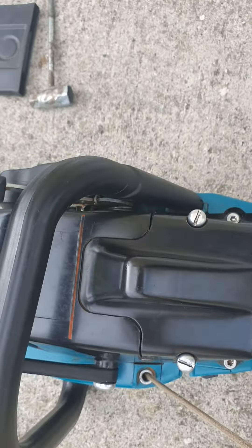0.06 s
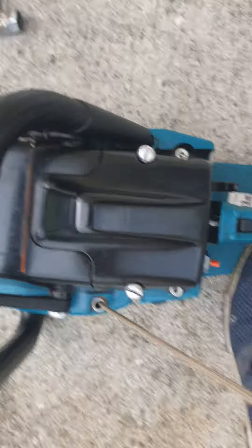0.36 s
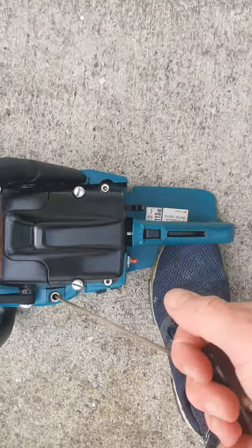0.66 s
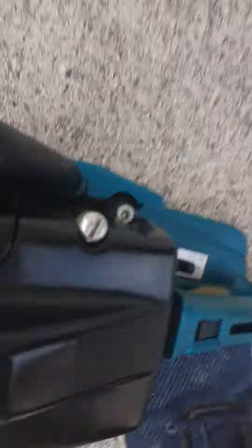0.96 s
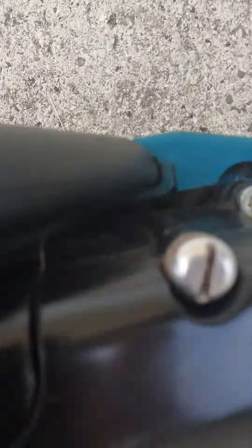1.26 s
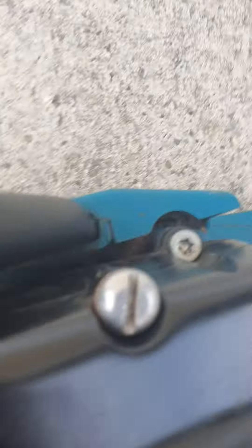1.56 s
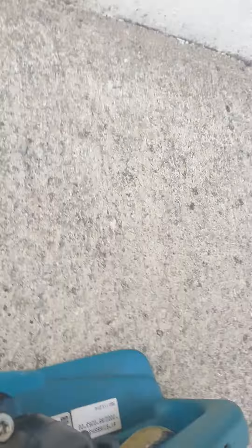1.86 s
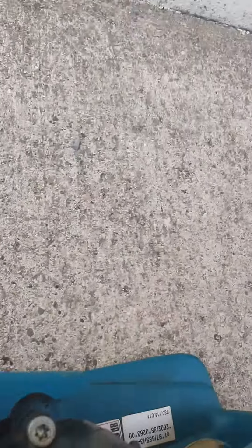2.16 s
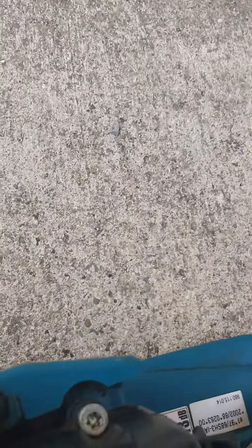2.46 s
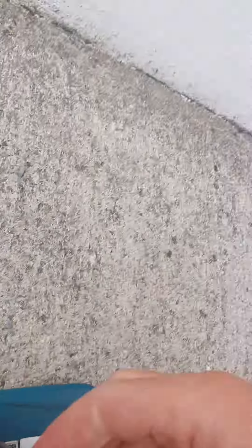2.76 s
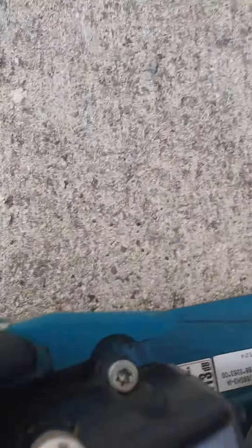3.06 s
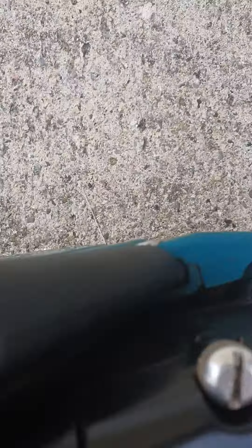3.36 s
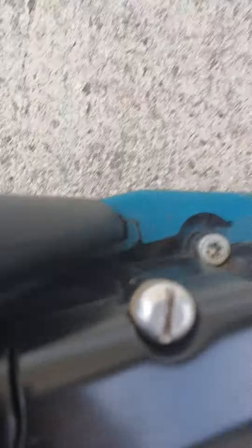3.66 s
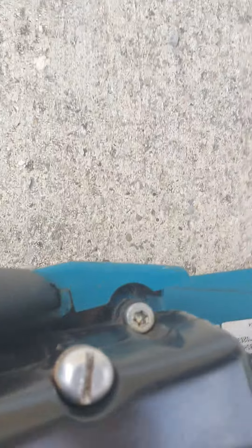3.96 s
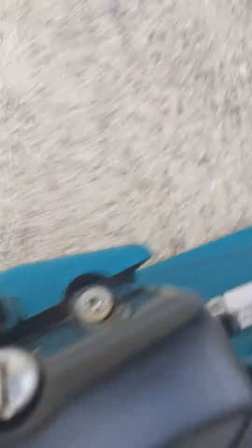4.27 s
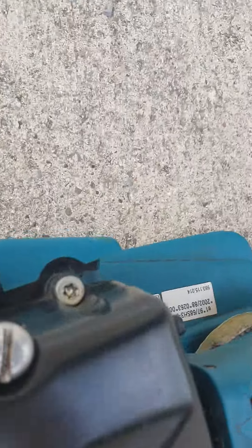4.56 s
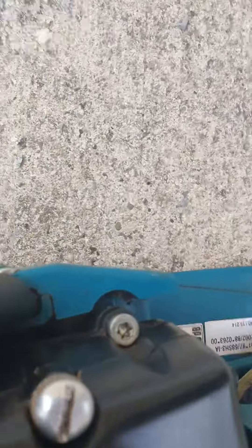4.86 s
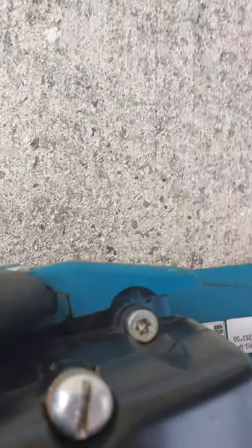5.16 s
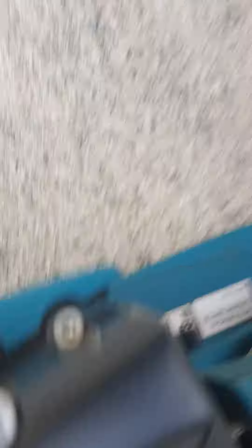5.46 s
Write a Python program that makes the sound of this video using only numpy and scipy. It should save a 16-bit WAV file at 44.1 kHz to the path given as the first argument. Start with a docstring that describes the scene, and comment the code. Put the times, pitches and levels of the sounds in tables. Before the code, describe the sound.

A petrol chainsaw is being pull-started close to the microphone in a concrete yard. Sharp metal clacks come as the cord takes up, then a pull spins the engine, which chugs to a stop while the cord ratchets back. Hollow plastic knocks and more clicks follow. A second pull fails the same way. On the third the engine fires and runs briefly with a fast, uneven, barking putter.

```python
"""A concrete yard, close up on a petrol chainsaw being pull-started.
Steel pawls clack on the flywheel as the rope takes up. Two pulls spin the engine, each compression
gulping air, and it chugs to a stop while the rope ratchets back. Hollow plastic parts knock between
pulls. On the third it fires and settles into a fast, four-stroking idle: every turn puffs through
the muffler, but only some ignite with a sharp bark."""
import sys
import numpy as np
from scipy import signal
from scipy.fft import rfft, irfft, next_fast_len
from scipy.io import wavfile
from scipy.ndimage import map_coordinates

SR = 44100
rng = np.random.default_rng(int(sys.argv[2]) if len(sys.argv) > 2 else 0)


def store_pcm(level_fs):
    """Save levels as 16-bit WAV."""
    pcm = np.round(np.clip(level_fs, -1, 1) * 32767).astype(np.int16)
    wavfile.write(sys.argv[1], SR, np.atleast_2d(pcm).T)


N = 252693
TIME = np.arange(N) / SR
AGE = np.arange(SR // 4) / SR  # seconds into a one-shot

# crank speed through each pull of the rope: t/s, speed/(turns/s)
FIRST_PULL = [(1.445, 0), (1.5, 28.5), (1.55, 45.3), (1.67, 31.1), (1.745, 17.6), (1.96, 10.3), (2.16, 0)]
SECOND_PULL = [(4.065, 0), (4.11, 22.7), (4.23, 42.1), (4.34, 23.4), (4.39, 16.3), (4.55, 9.9), (4.76, 0)]
THIRD_PULL = [(5.25, 0), (5.3, 30.6), (5.37, 40.6), (5.41, 41.6), (5.45, 55.1), (5.49, 54.2), (5.58, 68.9),
              (5.74, 68)]
# weight of each pull's chug: speed curve, level/dB, first-compression accent/dB, port re gulp/dB
CHUGS = [(FIRST_PULL, -8.5, 9.6, -9.5), (SECOND_PULL, -6.5, 5.9, 0.85), (THIRD_PULL, -6.5, -9.5, -5)]
# rush of gas and bearings in the failed pulls: speed curve, level/dB
FAILED_SPINS = [(FIRST_PULL, -21.5), (SECOND_PULL, -20)]
# the rope snatches and shakes the saw: t/s, level/dB
ROPE_SNATCHES = [(1.521, -8.5), (1.526, -9), (1.68, -2), (1.688, -6), (1.758, -16.5), (4.102, -7.5),
                 (4.14, -8.5)]
# spells when every second turn fires sharply: start/s, end/s, crack level/dB
SHARP_FIRING = [(5.415, 5.435, -13), (5.455, 5.47, -22), (5.49, 5.51, -10), (5.54, 5.615, -9),
                (5.615, 5.73, -9)]
# muffler roar as the engine picks up: t/s, level/dB
ROAR_FADER = [(5.25, -51.5), (5.32, -26), (5.43, -19.5), (5.51, -17.5), (5.73, -21)]
# pawls catch: t/s, steel level/dB, housing level/dB, pan L-R/dB
PAWL_CATCHES = [(0.0482, -7.5, -16.5, -1), (0.573, -7, -34, -2.5), (0.8642, -6, -27.5, -3),
                (1.1611, -17, -28, -2.5), (1.4378, -2.5, -10.5, -6), (1.5293, -6, -13, -2.5),
                (3.5274, -6.5, -14, -2), (3.676, -6.5, -15.5, -2), (4.0583, -8, -20, -7),
                (4.2489, -19.5, -29, -21), (5.2411, -15.5, -23, -3.5), (5.4226, -14.5, -25, -9.5),
                (5.4405, -9.5, -32, -2)]
# pawls skip as the rope rewinds: t/s, count, gap/s, level/dB, pan L-R/dB
PAWL_SKIPS = [(0.0424, 1, 0, -14.5, -12.5), (0.7817, 1, 0, -32.5, -4), (1.108, 2, 0.01, -7.5, -0.5),
              (1.3792, 1, 0.078, -28, -5), (1.687, 2, .021, -12, -2), (1.747, 4, .0205, -14, -9.5),
              (1.881, 4, 0.027, -10, -6), (2.2316, 1, 0.0064, -14.5, -6.5), (3.9946, 1, 0.0046, -19, -6),
              (4.35, 2, .0424, -9, -10), (4.47, 2, .0235, -8, -8.5), (4.517, 2, .025, -11, -8.5),
              (4.5949, 1, 0, -9.5, -2.5), (4.8784, 1, 0, -17.5, -4.5)]
# switch and handle knocks: t/s, level/dB, f/Hz, pan L-R/dB
PLASTIC_KNOCKS = [(0.299, -26.5, 364, -10.5), (0.478, -32.5, 301, -11), (0.507, -31.5, 580, -12),
                  (0.53, -28.5, 363, -12), (2.137, -29.5, 400, -1), (2.169, -30.5, 710, -2),
                  (2.404, -12, 1120, -6.5), (2.46, -7, 804, -6), (2.476, -9, 980, -3.5),
                  (2.531, -18, 900, -3), (2.694, -34.5, 800, -8.5), (2.741, -12, 1055, -2),
                  (3.09, -17, 1025, -2.5), (3.105, -16, 960, -12), (3.114, -21.5, 448, -6),
                  (3.348, -27.5, 1066, -4.5), (3.576, -27.5, 2560, 6), (3.601, -19, 2450, 1),
                  (3.611, -19.5, 2570, 4), (3.721, -17, 700, 0), (4.749, -25, 757, -5)]
# the hand slides the rope and shifts the saw: t/s, hold/s, rope level/dB, rumble level/dB
HAND_MOVES = [(0, 0.0088, -49, -46.5), (0.371, 0.047, -45, -46.5), (0.464, 0.19, -52.5, -45.5),
              (0.841, 0.11, -48.5, -35), (0.98, 0.19, -54.5, -42), (1.395, 0.65, -54, -43.5),
              (2.803, .02, -70, -64.5), (3.125, 0.0096, -57, -55), (3.321, 0.033, -59, -51.5),
              (3.483, 0.097, -51, -51), (3.607, 0.044, -39.5, -39.5), (4.01, 0.61, -44.5, -49)]
# the saw rocks on the ground: t/s, level/dB, f/Hz
GROUND_THUMPS = [(0.804, -30.5, 123), (0.857, -17, 91), (0.892, -15.5, 140), (0.917, -18.5, 107),
                 (0.977, -26, 149), (1.143, -29, 75)]

# noise colours: f/Hz, level/dB
EXHAUST_EQ = [(150, -31), (250, -0.5), (348, -5), (414, -2), (775, -7.5), (1060, -7.5), (1180, -8.5),
              (1420, -12.5), (1700, -11.5), (2570, -13), (3400, -19.5), (4490, -21.5), (5730, -23),
              (8550, -22.5), (16000, -30)]  # throaty muffler
CRACK_EQ = [(1500, -38), (4000, -3.5), (8500, -0.5), (12000, -3), (16000, 0)]  # bright edge of a firing
RUSH_EQ = [(150, -42), (260, -3), (298, -13.5), (349, -4), (683, -14), (869, -17.5), (1250, -16.5),
           (1460, -17.5), (1700, -20.5), (2570, -21.5), (5500, -31.5), (7890, -37), (8750, -27.5),
           (12800, -33), (16000, -47.5)]  # gas and bearings
CLANK_EQ = [(180, -33), (400, -2), (850, 3.5), (1500, -5), (1800, -7.5), (2600, -9), (3400, -18.5),
            (4600, -18.5), (6500, -21.5), (10000, -26.5), (16000, -29)]  # loose parts
CLACK_EQ = [(300, -21), (700, -4), (1500, -0.5), (2100, -4.5), (3200, -0.5), (4400, -1.5), (6500, -14.5),
            (8000, -5), (9500, 0), (11000, -5), (12700, 4), (16000, -7.5)]  # pawl catching
TICK_EQ = [(250, -36), (500, -10), (1400, -15), (2600, -11.5), (3300, -5.5), (4200, -21.5), (6200, -21.5),
           (7800, -21), (9600, 4), (11500, -11.5), (13000, -5.5), (16000, -19.5)]  # pawl skipping
SNAP_EQ = [(900, -14.5), (1600, -22), (2100, 6.5), (2700, -4.5), (3400, -7), (4300, -6.5), (5500, -15.5),
           (8000, -12.5), (11000, -19.5), (16000, -24)]  # attack of a plastic knock
ROPE_EQ = [(150, -34), (250, -9), (501, -5.5), (971, -7), (1610, -13.5), (3520, -18), (5350, -25.5),
           (11300, -22), (16000, -40)]  # rope in its eyelet
RUMBLE_EQ = [(15, -32.5), (45, -3), (90, -2.5), (160, -13.5), (320, -21.5), (900, -66)]  # low end of draught and handling
# hollow body of a plastic part: multiple of its pitch, level/dB
HOLLOW_EQ = [(.15, -30), (.45, -12.5), (.8, -12), (1, -1), (1.3, -11.5), (1.9, -20.5), (3, -34.5),
             (7, -60.5)]
# casing resonances: f/Hz, width/Hz, gain/dB
CASING_BANDS = [(352, 490, 0.5), (930, 220, 4.5), (1444, 200, 11.5), (2556, 380, 10), (3180, 220, 11),
                (4330, 82, 11.5)]
# parts that ring when struck: f/Hz, level/dB, t60/s
HOUSING_MODES = [(558, -8.5, 0.043), (650, -5.5, 0.051), (963, -12, 0.036), (1355, -19, 0.054),
                 (1490, -11.5, 0.014)]
FLYWHEEL_MODES = [(3200, -14, .13), (4440, -5, .08), (9180, -11, .15), (9520, 0, .035), (10230, -4, .06),
                  (12050, -9, .11), (12450, -6, .09), (12800, 1, .05), (13600, -5, .06), (14590, -6, .05)]
# stereo image of the engine, muffler facing right: f/Hz, pan L-R/dB
ENGINE_PAN = [(60, -1.9), (140, 2), (330, -7.5), (700, -0.5), (1400, -3), (2800, 0.5), (5500, 4.5),
              (11000, -1)]
# stereo likeness of the noise: f/Hz, left-right correlation
STEREO_LIKENESS = [(40, 1), (120, 0.31), (250, 0.37), (600, 0.67), (1200, 0.26), (3000, 0.13), (8000, .1)]
# decay of the yard's reflections: f/Hz, t60/s
YARD_DECAY = [(100, 0.24), (1000, 0.2), (4000, 0.12), (14000, 0.028)]

CATCH_S = 5.365  # the engine fires
GULP_HZ, GULP_RISE_HZ, PORT_HZ = 95, 3.93, 330  # gulp at rest, its rise per turn/s, port gulp
GULP_KNEE, PORT_KNEE, RUSH_KNEE = 9.9, 29, 32.7  # turns/s for half strength
JOLT_LEAD_S, JOLT_DB = .009, -8  # the casing jerks just ahead of each gulp
BARK_DB, PUSH_DB, WEAK_BARK_DB = -16, -8, -8.5  # sharp bark, its gas push, weak bark re puff
FOLLOW_S, FOLLOW_DB = 0.0099, -8.5  # the second pawl trails the first in a run
SNAP_DB, SNAP_GROWTH = -4.5, 1.5  # snap of a 0 dB knock, dB of snap per dB of knock
MOVE_RISE_DB_S, ROPE_FALL_DB_S, RUMBLE_FALL_DB_S = 263, 129.5, 67.5
HISS_FLOOR_DB, RUMBLE_FLOOR_DB = -77.5, -63.5  # the still yard


def running_engine():
    """Every turn puffs through the muffler; only some ignite fully, with a sharp bark."""
    _, turns, compressions = crank(THIRD_PULL)
    times = TIME[compressions][TIME[compressions] > CATCH_S]
    puffs, barks = np.zeros((2, 2, N))
    for s in times:
        # each charge burns a little differently; slow strokes gulp deeper
        size_db, late_s, detune = rng.normal(0, [1.3, .0003, .1])
        depth_db = np.interp(s, [5.5, 5.58], [-9.5, -15])
        hz = np.interp(s, [5.4, 5.57], [260, 310]) * np.exp(detune)
        add(puffs, s + late_s, amp(depth_db + size_db) * stroke(hz, bite_db=-8, recoil_db=-6))
        add(barks, s, bark(depth_db + WEAK_BARK_DB))
    # burnt gas leaves in one slow push behind the bark, so the idle throbs
    push = np.sin(2 * np.pi * 76 * AGE) * fade(t60=.06, attack=.002)
    for start, end, crack_db in SHARP_FIRING:
        for s in times[(times > start) & (times < end)][::2]:
            body = bark(BARK_DB)
            crack = amp(crack_db + rng.normal(0, 1)) * burst(CRACK_EQ, t60=.026, attack=.0014)
            add(barks, s + .001, body + crack)
            add(puffs, s + .003, amp(PUSH_DB) * push)
    # the two lowest harmonics build as the engine gathers speed
    build = np.interp(TIME, [5.33, 5.45, 5.57], [0, .35, 1]) * amp(wobble(70))
    angle = 2 * np.pi * turns + .15 * wobble(50)
    hum = amp(-19.5) * build * (np.sin(angle) + np.sin(2 * angle))
    pulsing = amp(2.5 * np.cos(2 * np.pi * turns)) * unit(.5 + grit(rate=460, spread_db=-1.0))
    roar = amp(curves(ROAR_FADER, outside=-120)[0] - 3.5) * pulsing * noise(EXHAUST_EQ)
    return hum + puffs + casing(barks + roar)


def cranking_engine():
    """Compressions gulp air, lower and softer as the crank slows; the saw rushes and rattles."""
    gulps, rattle = np.zeros((2, 2, N))
    for pull, db, accent_db, port_db in CHUGS:
        speed, _, compressions = crank(pull)
        for i in compressions[TIME[compressions] < CATCH_S]:
            size = amp(db + accent_db * (i == compressions[0]) + rng.normal(0, 1))
            size *= drive(speed[i], GULP_KNEE, steepness=4.5)
            hz = GULP_HZ + GULP_RISE_HZ * speed[i]
            add(gulps, TIME[i], size * stroke(hz, bite_db=-11.5, recoil_db=-7.5))
            # half a turn later the ports open with a second gulp
            port_hz = PORT_HZ * np.exp(rng.normal(0, 0.18))
            port = gulp(port_hz, sink=0.83, glide_cycles=2.4, life_cycles=2.6)
            port_size = size * amp(port_db) * drive(speed[i], PORT_KNEE, steepness=3)
            add(gulps, TIME[i] + .5 / speed[i], port_size * port)
            add(rattle, TIME[i] - JOLT_LEAD_S, size * amp(JOLT_DB + rng.normal(0, 2)) * clank())
    for s, db in ROPE_SNATCHES:
        add(rattle, s, amp(db) * clank())
    flow = sum(amp(db) * drive(crank(pull)[0], RUSH_KNEE, steepness=2.16) for pull, db in FAILED_SPINS)
    rush = flow * unit((0.66 + grit(rate=210, spread_db=6.5)) * noise(RUSH_EQ))
    draught = amp(-4) * flow * noise(RUMBLE_EQ)  # buffeting from the flywheel fan
    return gulps + draught + casing(rattle + rush)


def crank(pull):
    """Crank speed, turns and sample indices of compression; the first comes after half a turn."""
    speed, = curves(pull, outside=0)
    turns = np.cumsum(speed) / SR + .5
    return speed, turns, np.flatnonzero(np.diff(np.floor(turns)))


def drive(speed, knee, steepness):
    """Strength 0-1 that grows with crank speed and levels off above the knee."""
    rise = (speed / knee) ** steepness
    return rise / (1 + rise)


def stroke(hz, bite_db, recoil_db):
    """One piston stroke: a sinking gulp whose steep front rings the muffler as the saw recoils."""
    cavity_hz = 330 * np.exp(rng.normal(0, .12))
    steepness = hz / 230  # quicker strokes bite harder
    front = steepness * np.sin(2 * np.pi * cavity_hz * AGE) * fade(t60=0.11, attack=0.00029)
    recoil = -np.sin(2 * np.pi * 86 * AGE) * fade(t60=0.1, attack=0.0025)
    air = gulp(hz, sink=0.24, glide_cycles=2.23, life_cycles=2.1)
    return air + amp(bite_db) * front + amp(recoil_db) * recoil


def gulp(hz, sink, glide_cycles, life_cycles):
    """A short tone diving toward sink * hz, like air ringing in a growing cavity."""
    pitch = hz * (sink + (1 - sink) * np.exp(-AGE * hz / glide_cycles))
    envelope = (1 - np.exp(-AGE * hz / 0.18)) * np.exp(-(AGE * hz / life_cycles) ** 2)
    return envelope * np.sin(2 * np.pi * np.cumsum(pitch) / SR)


def bark(db):
    """A tight burst of exhaust, never twice at the same strength."""
    return amp(db + rng.normal(0, 3)) * burst(EXHAUST_EQ, t60=.018, attack=.0007)


def clank():
    """Every jolt rattles a different loose part."""
    colour = [(hz, db + rng.normal(0, 3)) for hz, db in CLANK_EQ]
    return amp(-7.5) * burst(colour, t60=.04, attack=.0009)


def casing(x):
    """The saw's shell lifts the bands where it resonates."""
    def response(hz):
        return 1 + sum((amp(db) - 1) * 1j * hz * width / (centre ** 2 - hz ** 2 + 1j * hz * width)
                       for centre, width, db in CASING_BANDS)
    return filtered(x, response)


def starter_pawls():
    """Steel pawls strike the flywheel: hard when they catch, lightly when they skip."""
    out = np.zeros((2, N))
    for s, db, housing_db, pan_db in PAWL_CATCHES:
        # each catch lands on a new spot, with its own colour
        colour = [(hz, level + rng.normal(0, 2.5)) for hz, level in CLACK_EQ]
        steel = amp(-2) * burst(colour, t60=.032, attack=.002) + amp(-20) * ring(FLYWHEEL_MODES)
        add(out, s, amp(db) * steel + amp(housing_db + 1.0) * ring(HOUSING_MODES), pan_db)
        # the tip scrapes along the tooth just before it seats
        add(out, s - .005, amp(db - 13) * burst(CLACK_EQ, t60=0.01, attack=0.0018), pan_db)
    for s, count, gap_s, db, pan_db in PAWL_SKIPS:
        for skip_s in s + gap_s * np.arange(count):
            add(out, skip_s, amp(db + rng.normal(0, 1)) * skip(), pan_db)
            if count > 1:
                add(out, skip_s + FOLLOW_S, amp(db + FOLLOW_DB + rng.normal(0, 2)) * skip(), pan_db)
    return out


def skip():
    """A pawl ticks off a tooth; the flywheel rings faintly."""
    detune = np.exp(rng.normal(0, .03))
    colour = [(hz * detune, db) for hz, db in TICK_EQ]
    snap = burst(colour, t60=0.019, attack=0.0014)
    tail = amp(-6) * burst(colour, t60=0.053, attack=0.0013)
    return amp(-3) * (snap + tail) + amp(-29) * ring(FLYWHEEL_MODES)


def plastic_knocks():
    """A dry snap over each part's hollow body; harder knocks are brighter."""
    out = np.zeros((2, N))
    for s, db, hz, pan_db in PLASTIC_KNOCKS:
        colour = [(hz * multiple, level) for multiple, level in HOLLOW_EQ]
        body = burst(colour, t60=0.036, attack=0.00054)
        snap = burst(SNAP_EQ, t60=0.019, attack=0.00034)
        add(out, s, amp(db - 6.0) * body + amp(SNAP_DB + SNAP_GROWTH * db) * snap, pan_db)
    return out


def handling():
    """Rope slides through its eyelet and the saw rocks, over a faint bed of hiss and rumble."""
    sliding = np.max([amp(db) * swell(s, hold, ROPE_FALL_DB_S) for s, hold, db, _ in HAND_MOVES], 0)
    shifting = np.max([amp(db) * swell(s, hold, RUMBLE_FALL_DB_S) for s, hold, _, db in HAND_MOVES], 0)
    scrape = amp(1.5 * wobble(70) + 1.2 * wobble(18))
    rope = (amp(HISS_FLOOR_DB) + sliding) * unit(scrape * noise(ROPE_EQ))
    lumps = amp(2 * wobble(15))
    rumble = (amp(RUMBLE_FLOOR_DB) + shifting) * unit(lumps * noise(RUMBLE_EQ))
    thumps = np.zeros((2, N))
    for s, db, hz in GROUND_THUMPS:
        add(thumps, s, amp(db) * gulp(hz, sink=0.44, glide_cycles=1.7, life_cycles=2.3))
    return rope + rumble + thumps


def swell(s, hold_s, fall_db_s):
    """Envelope of one hand move: it rises up to time s, holds, then dies away."""
    before, after = np.maximum(s - TIME, 0), np.maximum(TIME - s - hold_s, 0)
    return amp(-MOVE_RISE_DB_S * before - fall_db_s * after)


def yard_reverb(x):
    """Ground and walls answer with a short tail, the treble dying first."""
    hz, t, spectra = signal.stft(rng.standard_normal((2, SR // 2)), SR, nperseg=256)
    decay = amp(-60 * t / along(YARD_DECAY, hz)[:, None])
    _, tail = signal.istft(spectra * decay, SR, nperseg=256)
    return signal.fftconvolve(x, tail / np.linalg.norm(tail[0]), axes=1)[:, :N]


def ring(modes):
    """Decaying modes, at new strengths for each hit and each ear."""
    out = 0
    for hz, db, t60 in modes:
        strike = amp(db + rng.normal(0, 3) + rng.normal(0, 2, (2, 1)))
        phase = rng.normal(0, 1, (2, 1))
        out += strike * fade(t60, attack=0.00011) * np.sin(2 * np.pi * hz * AGE + phase)
    return out


def burst(spectrum, t60, attack):
    """A short puff of coloured noise."""
    return noise(spectrum, size=len(AGE)) * fade(t60, attack)


def fade(t60, attack):
    """Envelope of one hit; both times in seconds."""
    return np.exp(-np.log(1000) * AGE / t60) * (1 - np.exp(-AGE / attack))


def grit(rate, spread_db):
    """A grainy envelope of tiny uneven impacts, rate a second."""
    hits = (rng.random(N) < rate / SR) * amp(spread_db * np.minimum(rng.standard_normal(N), 2))
    power = signal.fftconvolve(hits ** 2, fade(t60=0.014, attack=.0002))[:N]
    return unit(np.sqrt(np.abs(power)))


def noise(spectrum, size=N):
    """Coloured stereo noise of rms 1, centred in the deep bass and wide in the treble."""
    padded = next_fast_len(size)
    hz = np.fft.rfftfreq(padded, 1 / SR)
    width = np.arccos(np.clip(along(STEREO_LIKENESS, hz), -1, 1)) / 2
    coloured = rfft(rng.standard_normal((2, padded))) * amp(along(spectrum, hz))
    mid, side = irfft(coloured * [np.cos(width), np.sin(width)], padded)[:, :size]
    return unit(np.array([mid + side, mid - side]))


def wobble(rate):
    """A smooth random curve, rate knots a second."""
    return map_coordinates(rng.standard_normal(N // 20), [TIME * rate], mode="wrap")


def filtered(x, response):
    """EQ x with a gain given as a function of frequency."""
    padded = next_fast_len(N + SR // 2)
    return irfft(rfft(x, padded) * response(np.fft.rfftfreq(padded, 1 / SR)), padded)[..., :N]


def add(track, s, sound, pan_db=0):
    """Mix a one-shot into a stereo track at time s; positive pan is left."""
    start = max(round(s * SR), 0)
    part = track[:, start:start + len(AGE)]
    part += (sound * amp([[pan_db / 2], [-pan_db / 2]]))[:, :part.shape[1]]


def curves(rows, outside=None):
    """One automation curve for each column after the time."""
    times, *columns = np.transpose(rows)
    return [np.interp(TIME, times, column, outside, outside) for column in columns]


def along(points, hz):
    """Read (f/Hz, value) points on a log frequency axis."""
    knots_hz, values = np.transpose(points)
    return np.interp(np.log(hz + 1), np.log(knots_hz + 1), values)


def amp(db):
    """Decibels to gain."""
    return 10 ** (np.asarray(db) / 20)


def unit(x):
    """Scale to rms 1."""
    return x / np.sqrt(np.mean(x ** 2) + 1e-20)


def scene():
    """The saw up front, a touch of yard behind it, and dry handling noise."""
    engine = cranking_engine() + running_engine()
    panned = filtered(engine, lambda hz: amp(along(ENGINE_PAN, hz) * [[.5], [-.5]]))
    saw = panned + starter_pawls() + plastic_knocks()
    return saw + amp(-22) * yard_reverb(saw) + handling()


def record(dry):
    """Master chain: trim the deepest rumble, round off the peaks, cut the very top."""
    low_cut_hz, ceiling, top_hz = 24, .97, 15850
    thinned = filtered(dry, lambda hz: hz ** 2 / (hz ** 2 + low_cut_hz ** 2))
    rounded = thinned / (1 + (thinned / ceiling) ** 8) ** (1 / 8)
    return filtered(rounded, lambda hz: 1 / (1 + (hz / top_hz) ** 100))


dry = scene()
out = record(dry)
store_pcm(out)
```